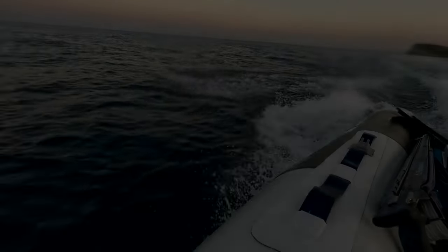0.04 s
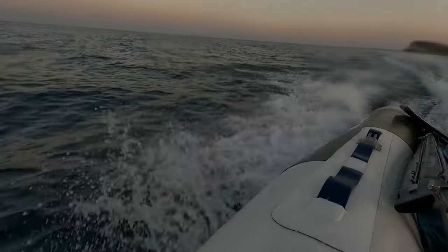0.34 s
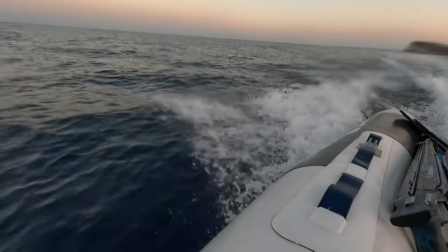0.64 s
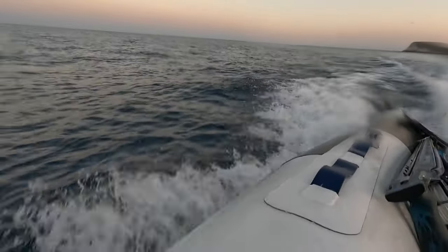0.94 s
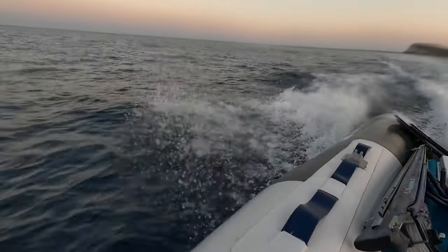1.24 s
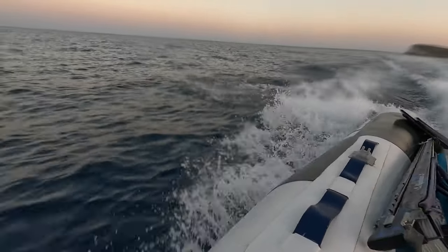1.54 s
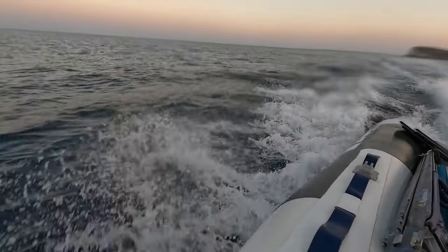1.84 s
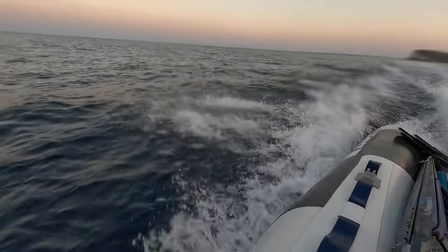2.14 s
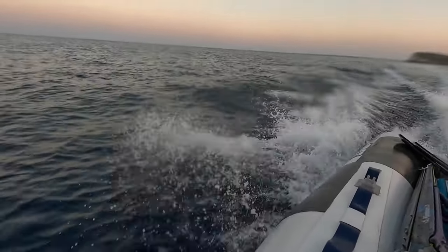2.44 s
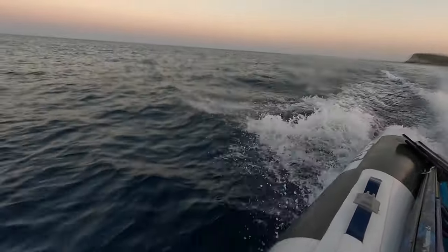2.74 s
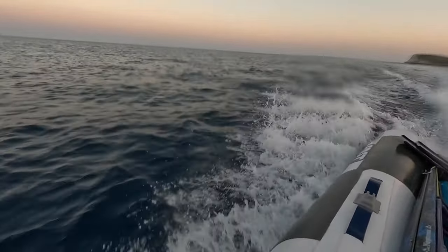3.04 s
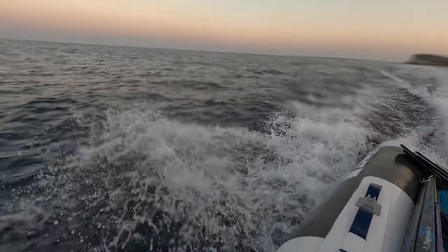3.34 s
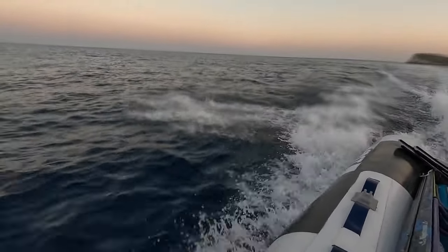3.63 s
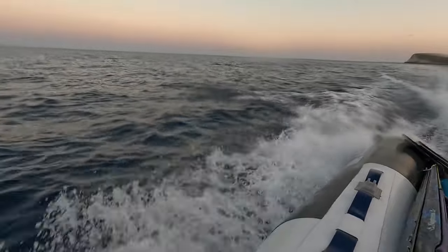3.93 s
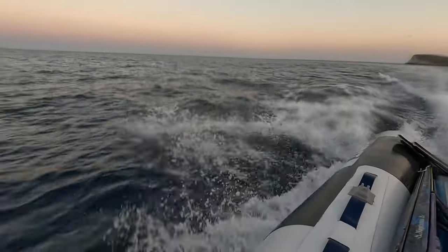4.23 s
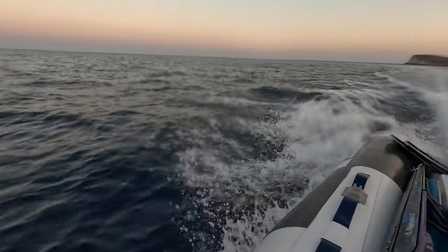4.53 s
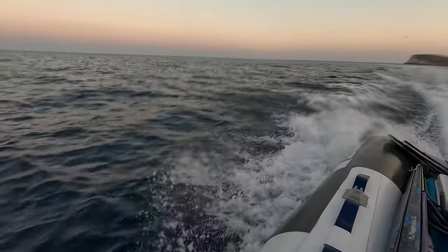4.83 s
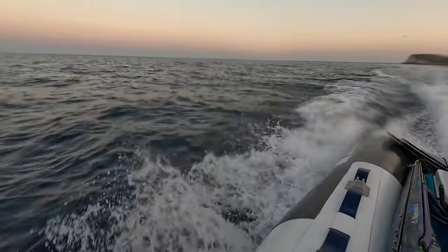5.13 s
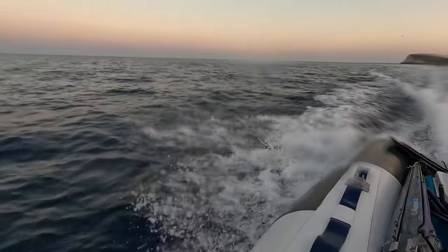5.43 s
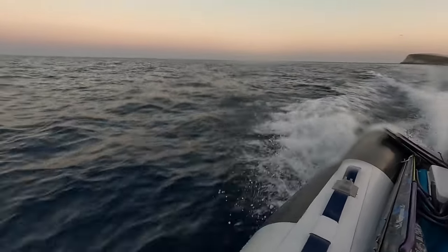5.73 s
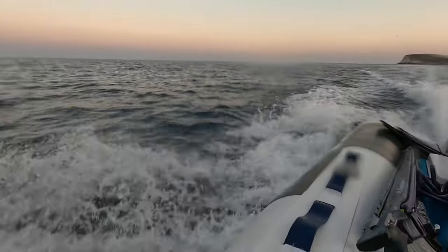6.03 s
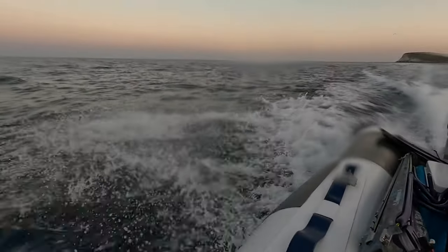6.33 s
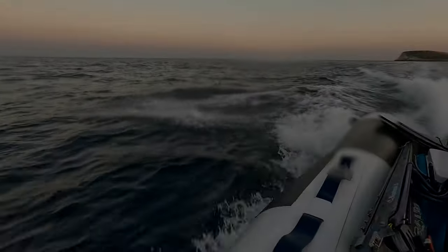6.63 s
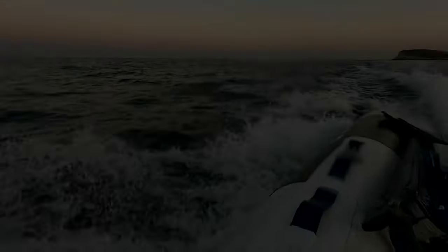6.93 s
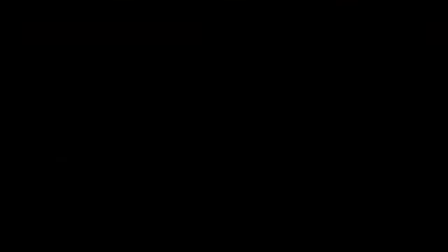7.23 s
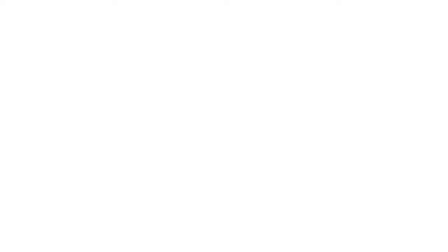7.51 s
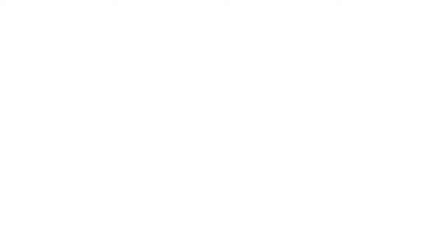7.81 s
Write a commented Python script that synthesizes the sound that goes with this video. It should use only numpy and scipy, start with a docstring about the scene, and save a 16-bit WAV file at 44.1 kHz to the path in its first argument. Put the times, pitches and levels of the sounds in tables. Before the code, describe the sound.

The sound fades in over the first 0.6 seconds, heard through a small cased microphone aboard a fast inflatable boat. An outboard engine hums at a steady pitch with a faint whine, swelling and dipping slightly, under a deep wind rumble. Water churns and foams in uneven surges throughout, and spray hisses as it falls back. Drops patter close by at about 0.7 seconds and now and then afterwards. Dull hull slaps come near 1 second, followed by low wind thumps. The strongest slap lands at about 2.9 seconds, amid heavy buffeting and thumping that lasts until 3.5 seconds. More gusts and rushing water follow, with slaps around 4, 5.3 and 6 seconds. From about 6.4 seconds everything fades, reaching silence by 7.5 seconds.

```python
"""A fast inflatable boat cuts through a choppy sea, its hull churning up sheets of foaming water.
Air trapped under the hull throbs at each slap, and spray patters back, some of it close by.
All is heard on board through a small cased microphone: swirls of wind (eddies) buffet and
thump the case, while a six-cylinder outboard engine hums behind. The sound fades in and out."""
import sys
import numpy as np
from scipy import signal
from scipy.fft import rfft, irfft
from scipy.io import wavfile
from scipy.ndimage import uniform_filter1d, minimum_filter1d

SR = 44100
rng = np.random.default_rng(int(sys.argv[2]) if len(sys.argv) > 2 else 0)


def unload_wav(signal):
    """Save mono or channel-first audio to the path in sys.argv[1] as 16-bit WAV at rate SR, clipped to [-1, 1]."""
    wavfile.write(
        sys.argv[1],
        SR,
        np.round(np.clip(np.atleast_2d(signal).T, -1, 1) * 32767).astype(np.int16),
    )


N = 351338
TIME = np.arange(N) / SR


def undb(db):
    """Turn decibels into a gain to multiply by."""
    return 10 ** (np.asarray(db) / 20)


def unit(x):
    """Scale a sound so its average power is 1."""
    return x / np.sqrt(np.mean(x ** 2))


def noise():
    """Plain white hiss."""
    return rng.standard_normal(N)


def curves(table):
    """Join each column's values with straight lines; the first column gives the times."""
    times, *columns = np.transpose(table)
    return [np.interp(TIME, times, column) for column in columns]


def colour(x, spectrum):
    """Shape a sound's tone by (Hz, dB) points, falling away past both ends; its power comes out as 1."""
    hz, db = np.transpose(spectrum)
    freqs = np.maximum(np.arange(N // 2 + 1) * SR / N, 1)
    roll_off = np.minimum(freqs / hz[0], 1) ** 2 * np.minimum(hz[-1] / freqs, 1) ** 2
    gain = undb(np.interp(np.log(freqs), np.log(hz), db))
    return unit(irfft(rfft(x) * roll_off * gain, N))


def wander(rate):
    """A smooth random wobble, about 1 in size, that picks a new value rate times a second."""
    hold = max(int(SR / rate), 1)
    steps = noise()[np.arange(N) // hold]
    return unit(uniform_filter1d(uniform_filter1d(steps, hold), hold))


def impacts(rate, spread_db):
    """Random clicks, about rate a second; spread_db sets how much their sizes differ."""
    size = undb(spread_db * np.minimum(rng.exponential(size=N), np.pi))
    hits = rng.random(N) < rate / SR
    return unit(hits * size * np.sign(noise()))


def burst(start_s, decay_s, rise_s):
    """The loudness of a hit: it rises quickly, then dies away."""
    age = np.clip(TIME - start_s, 0, 1)
    return (1 - np.exp(-age / rise_s)) * np.exp(-age / decay_s)


def surges(steady_db, swells):
    """The loudness of a steady flow plus swells that each build to a peak and die away."""
    power = undb(steady_db) ** 2
    for peak_s, db, rise_s, decay_s in swells:
        age = TIME - peak_s
        swell = np.exp(np.maximum(np.minimum(age / rise_s, -age / decay_s), -20))
        power = power + (undb(db) * swell) ** 2
    return np.sqrt(power)


# How the engine runs. Each row: time in seconds, firing rate in Hz, level change in dB.
ENGINE_RUN = [(0.45, 202.4, -1), (0.72, 202.4, 2.5), (1.05, 202.4, 3), (1.55, 201.8, -2), (2.4, 202.2, 2),
              (3.15, 202, -5), (3.9, 202.6, -3.5), (4.3, 202.8, 1), (4.85, 204.2, -2), (5.15, 203.8, 2),
              (5.75, 202.8, -1.5), (6.3, 203.6, 2)]
# The engine's tones. Each row: vibrations per four-stroke cycle, relative level in dB.
# 6 is the firing note; 48 and 90 are gear whine.
ENGINE_TONES = [(3, -11.5), (4, -14.5), (5, -7), (6, 2.5), (7, -8.5), (8, -18), (10, -13.5), (48, -21.5),
                (90, -29)]

def outboard(hum_db=-42.5, wobble=0.004, cylinders=6):
    """Tones follow the turning crank; the firing note flutters as the exhaust dips in the wake."""
    firing_hz, change_db = curves(ENGINE_RUN)
    cycles = np.cumsum(firing_hz * (1 + wobble * wander(14))) / SR / cylinders
    flutter_db = 1.7 * wander(16)
    hum = 0
    for multiple, db in ENGINE_TONES:
        gain = undb(db + (flutter_db if multiple == cylinders else 0))
        hum = hum + gain * np.sin(2 * np.pi * (multiple * cycles + rng.random()))
    return np.sqrt(2) * undb(hum_db + change_db) * hum


def eddies(spectrum, span_s, evenness):
    """The noise of swirling air; evenness near 1 keeps its strength steady from span to span."""
    swirl = colour(noise(), spectrum)
    power = uniform_filter1d(swirl ** 2, int(span_s * SR)) + 1e-9
    return unit(swirl / power ** (evenness / 2))


# The strength of the large, slow eddies. Each row: time in seconds, relative level in dB.
RUMBLE_LEVELS = [(0.5, -31), (0.75, -26), (0.95, -29.5), (1.1, -23), (1.45, -24.5), (1.93, -29.5),
                 (2.1, -25.5), (2.45, -27.5), (2.72, -22), (3.3, -24.5), (3.55, -32), (3.75, -23),
                 (4.15, -22.5), (4.7, -30.5), (5.2, -23.5), (5.65, -29.5), (5.9, -23.5), (6.6, -30)]
# Gusts on the case. Each row: peak time in seconds, relative level in dB, decay in seconds.
WIND_GUSTS = [(0.8, -34, 0.087), (1.04, -32.5, 0.081), (1.45, -40, 0.16), (2.62, -31, 0.08),
              (2.9, -24.5, 0.23), (3.15, -30, 0.11), (3.33, -27, 0.11), (3.7, -29, 0.11),
              (3.98, -28, 0.075), (4.2, -27, 0.14), (4.56, -31.5, 0.054), (4.93, -35, 0.26),
              (5.11, -27.5, .14), (5.42, -29.5, 0.17), (5.97, -29, 0.16), (6.67, -42, 0.062),
              (6.96, -31.5, 0.077)]
# The tone of large eddies, then of small ones. Each row: frequency in Hz, relative level in dB.
RUMBLE_TONE = [(3, 8), (10, 9.5), (28, 4), (55, -4), (75, -19), (130, -47.5)]
BUFFET_TONE = [(35, -20.5), (62, 3), (105, -1), (170, -11), (260, -21), (500, -32.5), (1200, -50.5)]

def wind(rumble_db=3.5, buffet_db=3.0, lull_db=1.5, breeze_db=-39.5, gust_rise_s=0.12):
    """Large eddies rock the microphone while small ones flap against it in gusts."""
    large_db, = curves(RUMBLE_LEVELS)
    gusting = surges(breeze_db, [(s, db, gust_rise_s, decay_s) for s, db, decay_s in WIND_GUSTS])
    rumble = eddies(RUMBLE_TONE, span_s=0.12, evenness=0.87)
    buffet = eddies(BUFFET_TONE, span_s=0.084, evenness=1.0)
    flapping = gusting * undb(buffet_db + lull_db * wander(25))
    return undb(large_db + rumble_db) * rumble + flapping * buffet


# Single big eddies. Each row: peak time in seconds, level in dB, pitch in Hz.
BIG_EDDIES = [(1.1, -18.5, 35), (1.239, -17, 52), (2.835, -18, 36), (2.911, -16.5, 78), (3.015, -19, 110),
              (3.165, -14.5, 45), (3.29, -14, 55), (3.37, -14, 62), (3.439, -18.5, 52), (3.955, -17, 62),
              (4.18, -19, 59), (4.908, -16.5, 58), (6.25, -20, 30)]

def wind_thumps(width_cycles=0.75):
    """A big eddy passes the case: one deep push and pull of pressure."""
    out = 0
    for peak_s, db, hz in BIG_EDDIES:
        cycles = (TIME - peak_s) * hz
        passing = np.exp(-(cycles / width_cycles) ** 2)
        out = out + undb(db) * passing * np.sin(2 * np.pi * (cycles + rng.random()))
    return np.sqrt(2) * out


# How the case muffles nearby drops. Each row: frequency in Hz, relative level in dB.
CASE_MUFFLING = [(300, 14), (3900, -11.5), (5000, -6.5), (10500, -8), (12000, -19.5)]
# Nearby splashes. Each row: start in seconds, level in dB, centre pitch in Hz, decay in seconds.
CLOSE_SPLASHES = [(0.666, -30.5, 4400, 0.009), (0.65, -42, 2400, .045), (0.733, -39, 1700, .035),
                  (1.48, -37, 1800, .033), (2.632, -36, 1700, 0.03), (2.812, -42, 3200, .06),
                  (2.864, -39, 2500, 0.035), (3.226, -41.5, 2800, .025), (4.112, -40, 2600, .03),
                  (5.385, -36.5, 1400, .03), (6.072, -38.5, 2300, 0.02)]

def splashes(edge_db=-12.5):
    """Handfuls of drops strike the boat's air tube close by; finer drops sound higher."""
    drops = colour(impacts(12000, spread_db=3), CASE_MUFFLING)
    out = 0
    for start_s, db, hz, decay_s in CLOSE_SPLASHES:
        patter = colour(drops, [(hz / 2, edge_db), (hz, 0), (2 * hz, 2 * edge_db)])
        out = out + undb(db) * burst(start_s, decay_s, rise_s=0.003) * patter
    return out


# Hull slaps. Each row: start in seconds, level in dB, trapped air's pitch in Hz, decay in seconds.
HULL_SLAPS = [(0.947, -28, 260, 0.028), (0.985, -27.5, 215, .028), (2.861, -17, 115, 0.024),
              (3.831, -32, 520, 0.022), (3.979, -31, 450, .018), (4.111, -20.5, 140, 0.014),
              (5.269, -23.8, 370, 0.011), (5.922, -28.5, 280, .025), (5.975, -23.5, 260, 0.026),
              (7.039, -17.5, 620, .004)]

def hull_slaps(waver=0.12, sag=0.15, sag_s=0.025, upper_ratio=1.58, upper_db=-8, gush_db=-7):
    """The hull lands: water gushes out and trapped air throbs in two tones that sag as it escapes."""
    out = 0
    for start_s, db, hz, decay_s in HULL_SLAPS:
        gush = undb(gush_db) * colour(noise(), [(hz, 0), (2 * hz, -6)])  # deeper from a bigger pocket
        opening = 1 - np.exp(-np.maximum(TIME - start_s, 0) / sag_s)
        pitch_hz = hz * (1 + waver * wander(hz)) * (1 + sag * (0.5 - opening))
        phase = 2 * np.pi * np.cumsum(pitch_hz) / SR
        throb = np.sin(phase) + undb(upper_db) * np.sin(upper_ratio * phase)
        out = out + undb(db) * burst(start_s, decay_s, rise_s=0.0015) * (throb + gush)
    return out


def bubbles(low_hz, high_hz, rate, ring_cycles, sizes):
    """Each bubble rings for a few cycles and rises in pitch as it nears the surface."""
    out = 0
    for hz in np.geomspace(low_hz, high_hz, sizes):
        cycles = np.arange(int(2 * np.pi * ring_cycles * SR / hz)) * hz / SR
        rising = 1 + 0.024 * cycles / ring_cycles
        ring = np.exp(-cycles / ring_cycles) * np.sin(2 * np.pi * cycles * rising)
        births = impacts(rate / sizes, spread_db=-0.5)
        out = out + np.sqrt(hz) * unit(signal.oaconvolve(births, ring)[:N])
    return unit(out)


# Waves the hull cuts through. Each row: peak time in seconds, relative churn level in dB,
# relative foam level in dB, rise in seconds, decay in seconds.
BOAT_WAVES = [(0.351, -40, -43.5, 0.061, 0.1), (0.675, -40, -42.5, 0.041, 0.15),
              (0.99, -38.5, -42, 0.081, 0.12), (1.78, -44.5, -51, 0.14, 0.19),
              (2.13, -42, -43.5, 0.078, 0.2), (2.31, -39.5, -43.5, 0.076, 0.034),
              (2.63, -38.5, -43.5, 0.058, 0.049), (2.88, -36, -40, 0.045, 0.23),
              (3.13, -38.5, -42.5, 0.18, 0.59), (3.71, -40.5, -42, 0.012, 0.039),
              (3.89, -36, -43.5, .015, 0.18), (3.99, -37.5, -44.5, 0.054, 0.011),
              (4.12, -39.5, -42.5, 0.021, 0.25), (4.58, -38.5, -48, 0.074, 0.13),
              (4.9, -43.5, -45.5, 0.32, 0.49), (5.1, -36, -44, .045, 0.17), (5.41, -38, -39, 0.083, 0.097),
              (5.97, -38.5, -47.5, 0.16, 0.17), (6.069, -46.5, -43.5, 0.048, 0.24),
              (6.4, -48, -52, 0.03, .2), (6.68, -39, -56, 0.045, 0.15), (6.94, -37.5, -47, 0.089, 0.12)]
# Spray falling back. Each row: peak time in seconds, relative drop level in dB, fizz level in dB.
SPRAY_SHOWERS = [(0.691, -54, -76), (1.25, -61, -76), (1.9, -61, -73), (2.15, -54.5, -69), (2.72, -60, -76),
                 (3.16, -60, -73), (3.54, -55.5, -68), (3.92, -61.5, -75), (4.22, -59.5, -75),
                 (4.57, -58.5, -72), (4.89, -57, -68), (5.06, -60.5, -67.5), (5.3, -59.5, -72),
                 (5.46, -56.5, -72), (6.21, -57, -71.5), (6.43, -55.5, -73)]
# The tones of big air pockets, small bubbles, falling drops and the finest droplets, in that order.
# Each row: frequency in Hz, relative level in dB.
CHURN_TONE = [(110, -9), (190, 2.5), (260, 2), (400, -4.5), (540, -6.5), (760, -11), (1200, -22.5),
              (2500, -59)]
FOAM_TONE = [(400, -3), (800, 0), (1400, 0.5), (1750, 1), (2130, 0.5), (2380, -6), (2800, -5.5),
             (3050, -3.5), (3570, -9.5), (3900, -6), (4250, -21), (4800, -14.5), (7000, -36.5)]
SPRAY_TONE = [(2000, -7), (3950, 5.5), (4280, -0.5), (4700, 0.5), (5700, -2), (6200, -5.5), (7300, -5),
              (8400, -9), (8900, -13.5), (10500, -15), (11700, -30), (13100, -30), (15500, -35)]
FIZZ_TONE = [(6500, -15.5), (8300, 0), (10500, -3.5), (11700, -13.5), (13200, -10.5), (15300, -16.5)]

def hull_wash(churn_db=2.0, foam_db=0.53, spray_db=5.0, steady_db=-47.5, mist_db=-62):
    """Each wave churns big air pockets and breaks into small bubbles; drops rain back through mist."""
    churning = surges(steady_db, [(s, db, rise, decay) for s, db, _, rise, decay in BOAT_WAVES])
    breaking = surges(steady_db, [(s, db, rise, decay) for s, _, db, rise, decay in BOAT_WAVES])
    shower_rise_s, shower_decay_s = 0.11, 0.15
    falling = surges(mist_db, [(s, db, shower_rise_s, shower_decay_s) for s, db, _ in SPRAY_SHOWERS])
    fizzing = surges(mist_db - 22, [(s, db, shower_rise_s, shower_decay_s) for s, _, db in SPRAY_SHOWERS])
    tearing = wander(90)  # the sheet of water tears unevenly
    chop_db = 0.67 * wander(20)  # small waves between the big ones
    churn = colour(noise() + bubbles(169.1, 1080, rate=900, ring_cycles=2.18, sizes=12), CHURN_TONE)
    foam = colour(noise() + undb(-3) * bubbles(585, 5110, rate=3000, ring_cycles=2.5, sizes=16),
                  FOAM_TONE)
    spray = colour(noise() + undb(-3) * impacts(2500, spread_db=2), SPRAY_TONE)
    fizz = colour(noise() + impacts(4000, spread_db=4), FIZZ_TONE)
    return (churn * churning * undb(churn_db + 0.9 * tearing + chop_db)
            + foam * breaking * undb(foam_db + chop_db / 2)
            + spray * falling * undb(spray_db + tearing / 2 + chop_db)
            + fizz * fizzing * undb(2.8 * wander(22)))


def scene():
    """Engine, wind and water add up at one microphone."""
    return (outboard() + wind() + wind_thumps() + hull_wash() + hull_slaps() + splashes())[None]


def fade(in_end_s=0.6, in_db_per_s=57.5, out_start_s=6.371, out_db_per_s=55.5, silent_s=7.47):
    """Fade in and out evenly in dB, with a last short slide to silence."""
    fade_in_db = in_db_per_s * np.maximum(in_end_s - TIME, 0)
    fade_out_db = out_db_per_s * np.maximum(TIME - out_start_s, 0)
    closing = np.clip((silent_s - TIME) / 0.45, 0, 1)
    return undb(-fade_in_db - fade_out_db) * closing


def record(dry, ceiling=0.33, top_hz=15600):
    """A limiter turns down the hardest gusts; the sound is faded and its highest treble is cut."""
    hold = int(0.02 * SR)
    needed_gain = ceiling / np.maximum(np.abs(dry), ceiling)
    smooth_gain = uniform_filter1d(minimum_filter1d(needed_gain, hold), hold)
    treble_cut = signal.ellip(8, 0.2, 70, top_hz, fs=SR, output="sos")
    return signal.sosfilt(treble_cut, dry * smooth_gain * fade())


dry = scene()
out = record(dry)
unload_wav(out)
```